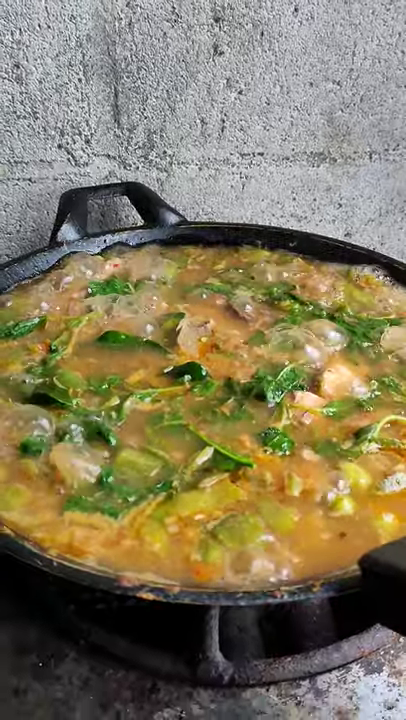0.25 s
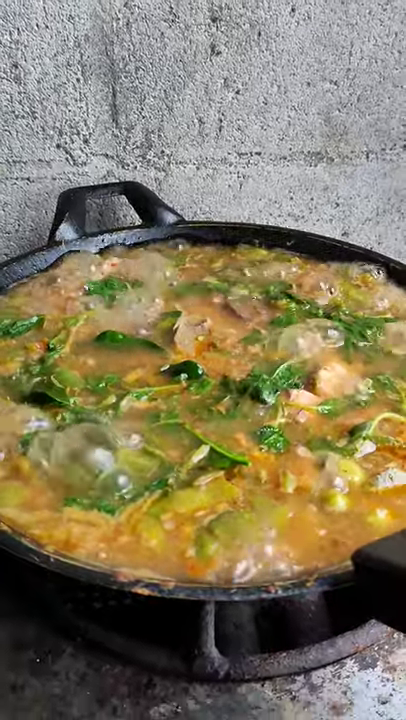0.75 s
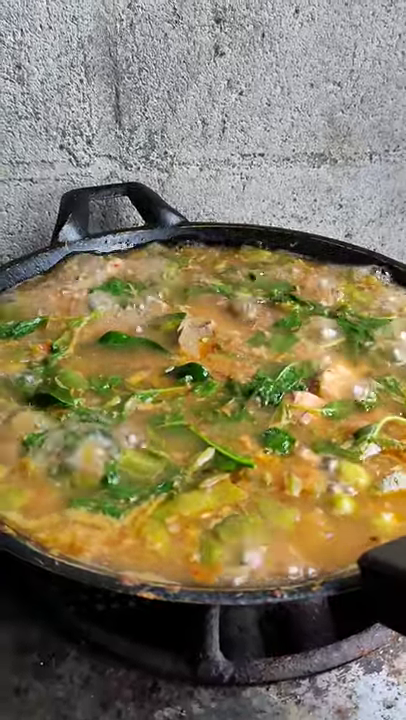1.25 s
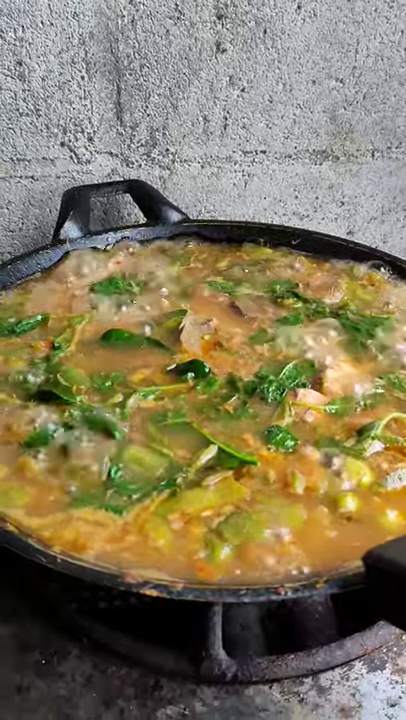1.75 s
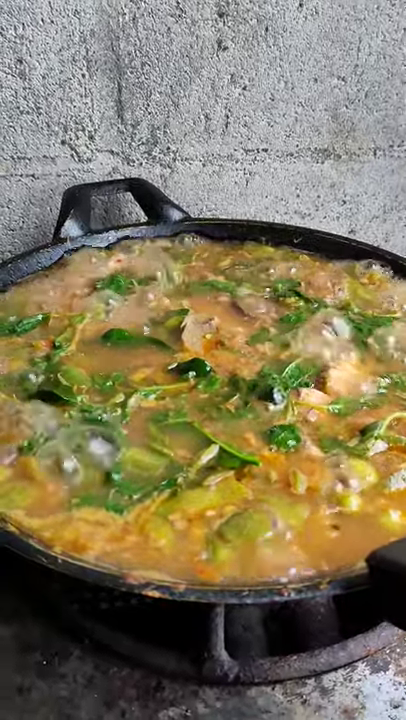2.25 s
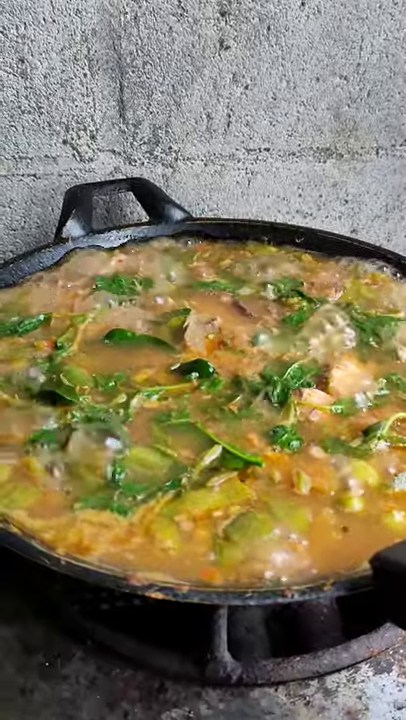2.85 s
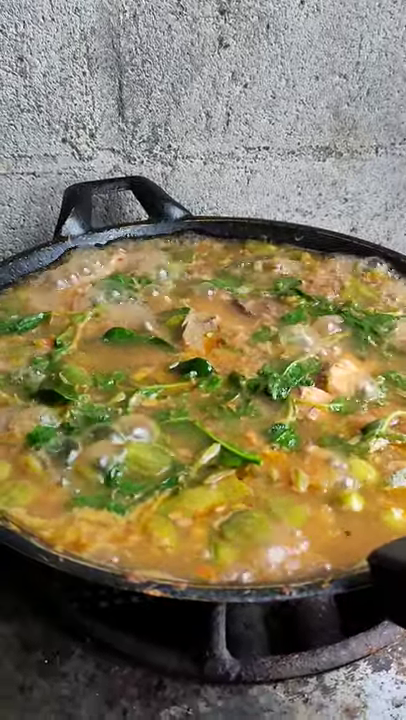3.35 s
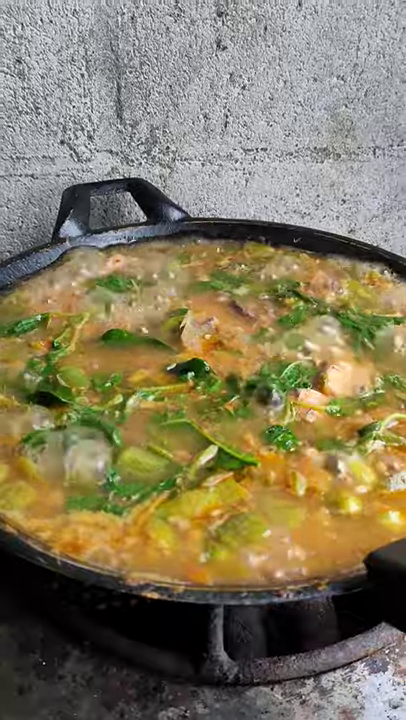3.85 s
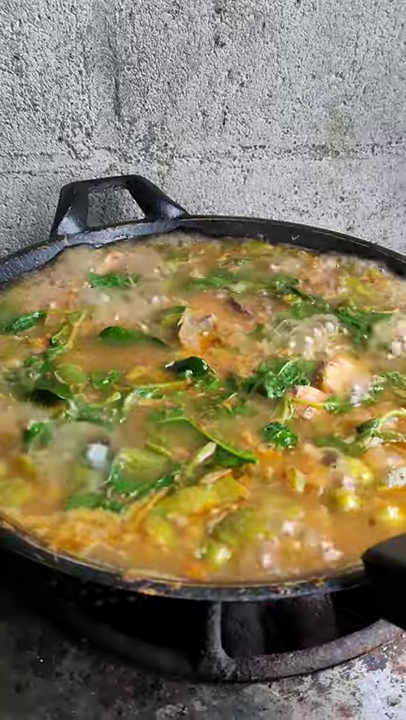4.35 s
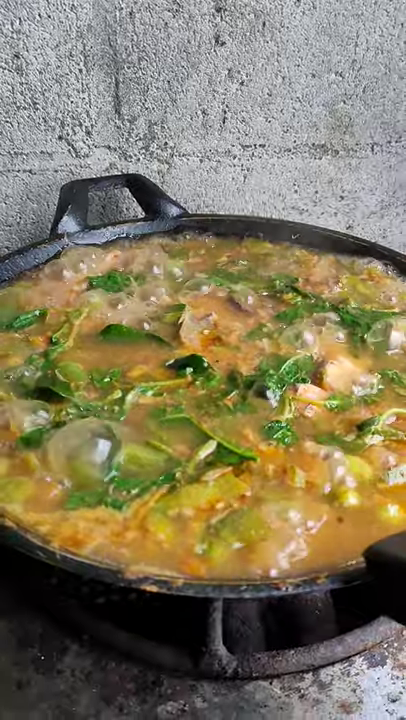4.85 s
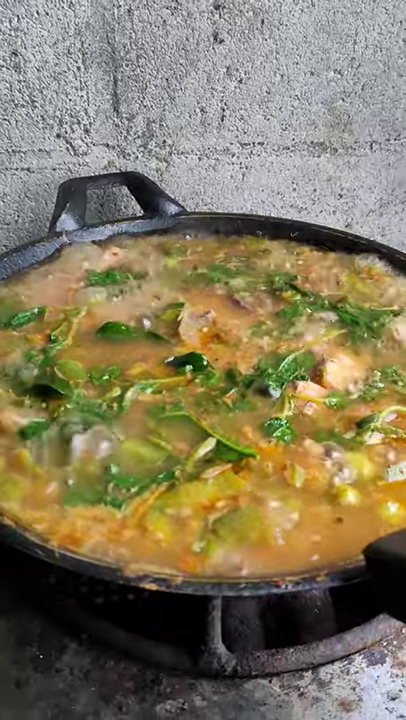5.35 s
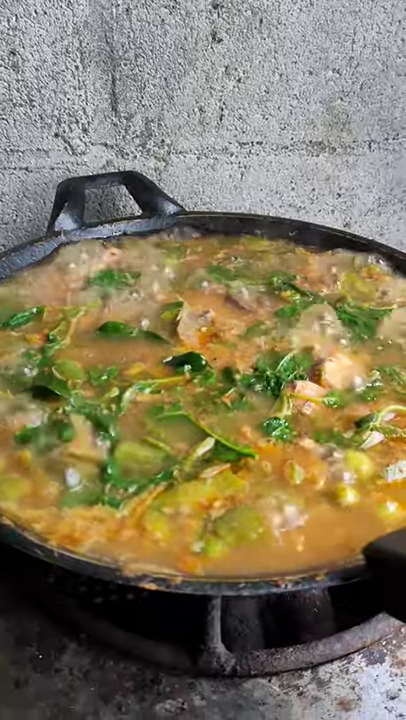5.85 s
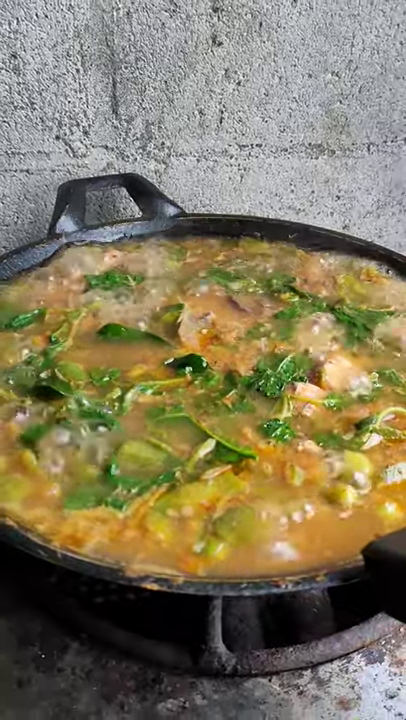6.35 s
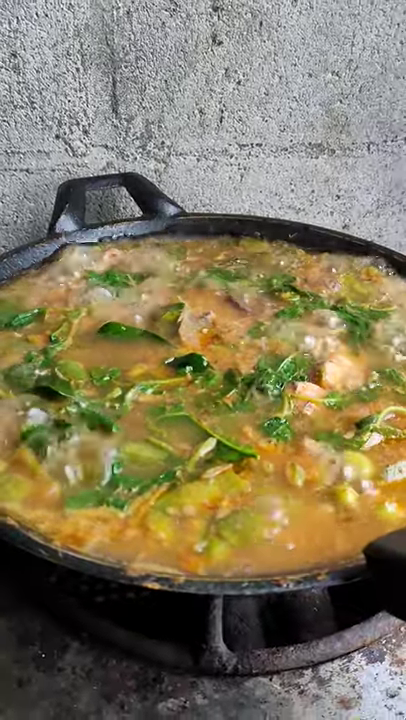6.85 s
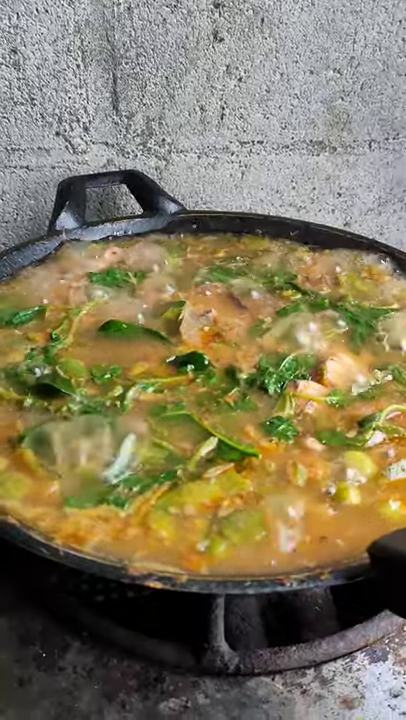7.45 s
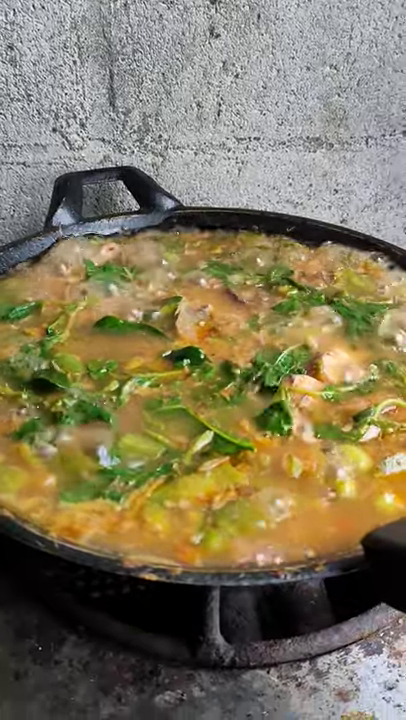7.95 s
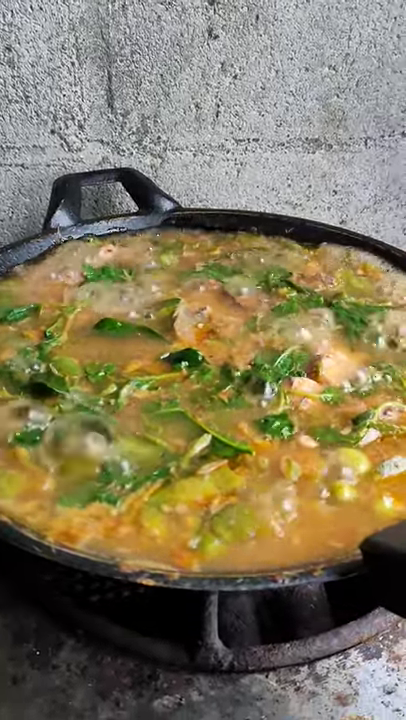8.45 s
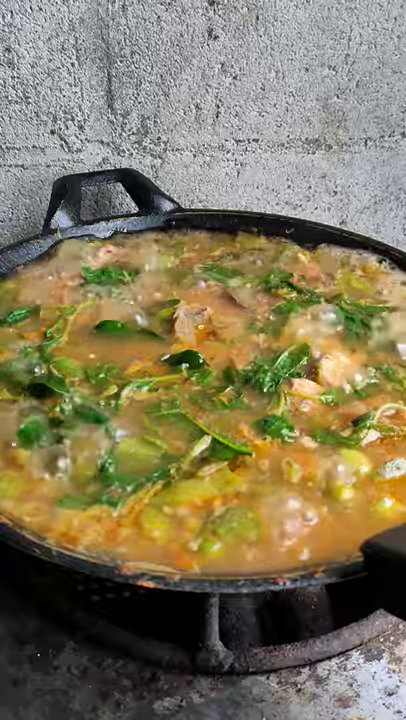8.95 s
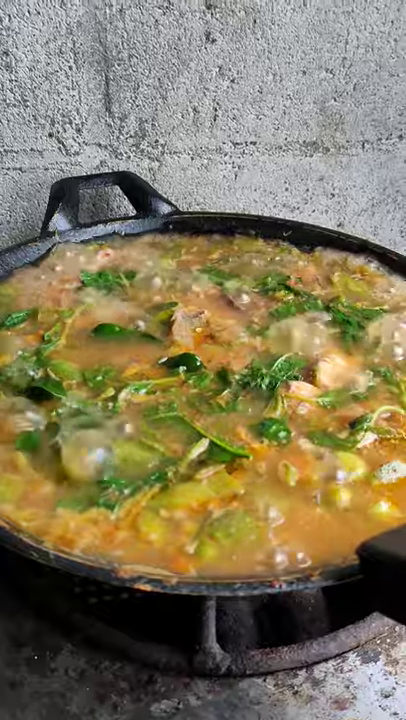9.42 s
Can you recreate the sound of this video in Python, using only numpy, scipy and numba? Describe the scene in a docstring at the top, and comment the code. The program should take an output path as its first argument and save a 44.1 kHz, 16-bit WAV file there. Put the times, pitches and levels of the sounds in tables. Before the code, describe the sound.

Close, continuous vigorous bubbling of a thick stew, bursting in uneven clusters, with snapping splashes, fine froth crackle and a soft burner hiss.

```python
"""Steam bubbles burst in clusters of short plops as thick broth boils hard in an iron pan on a gas ring,
just under a handheld phone beside a stone wall. Each bubble is a short decaying tone of rising pitch.
Splashes snap, a few squeaks glide up, froth crackles as a swarm of tiny bursts; the flame is noise.
Resonators ring the pan low, a short noise tail is the wall's answer, and the phone cuts the bass."""
import sys
import numpy as np
from scipy import signal
from scipy.fft import rfft, irfft, next_fast_len
from scipy.io import wavfile
from scipy.ndimage import uniform_filter1d
from numba import njit

SR = 44100
rng = np.random.default_rng(int(sys.argv[2]) if len(sys.argv) > 2 else 0)


def linear_from_db(decibels):
    """Turn decibels (scalar or array-like) into linear amplitude factors; 0 gives 1."""
    return 10 ** (np.asarray(decibels, float) / 20)


def pcm_store(signal):
    """Save signal as 16-bit PCM."""
    levels = np.round(np.clip(np.atleast_2d(signal), -1, 1) * 32767)
    wavfile.write(sys.argv[1], SR, levels.astype(np.int16).T)


N = 426888
STRONG_DB = -33  # peak of a strong bubble

# loudest bursting bubbles, before pan, wall and bass cut, with port colour included:
# [peak_s, peak_db, pitch_hz]
POPS = [(0.0262, -42.5, 2020), (0.032, -48, 1900), (0.0343, -48, 2400), (0.038, -51, 2600),
        (0.04, -50, 3300), (0.0437, -26.5, 6850), (0.045, -33, 4300), (0.0879, -29, 1860),
        (0.1382, -40, 1110), (0.1447, -36.5, 910), (0.1482, -30, 2100), (0.299, -38, 930),
        (0.3317, -30.5, 1860), (0.5425, -35.5, 720), (0.6869, -33.5, 930), (0.703, -38, 11700),
        (0.7784, -41, 7550), (0.821, -36, 705), (0.8318, -33, 606), (0.852, -31, 1410), (0.8682, -42, 8000),
        (0.8684, -32, 2080), (0.959, -40, 5660), (0.963, -51, 13320), (0.991, -43, 1100),
        (1.027, -45, 3370), (1.0178, -45, 7900), (1.1456, -42, 1690), (1.194, -42, 1500),
        (1.219, -41, 1400), (1.24, -42, 2030), (1.2463, -41, 4400), (1.2562, -34, 1550),
        (1.2978, -40, 13000), (1.307, -35.5, 530), (1.4603, -35.5, 580), (1.6266, -33.5, 2020),
        (1.729, -43, 9800), (1.8682, -38, 610), (1.9374, -48, 13200), (2.013, -38, 1960),
        (2.0163, -51, 12260), (2.053, -37, 8320), (2.288, -39, 1620), (2.43, -30.5, 1740),
        (2.515, -41, 960), (2.5438, -28.5, 2170), (2.6009, -36, 2180), (2.627, -38, 600), (2.66, -36, 1960),
        (2.6939, -35.5, 2040), (2.7452, -30.5, 1930), (2.751, -42, 12500), (2.7542, -36, 1200),
        (2.7605, -44, 8500), (2.8288, -30.5, 2020), (2.8516, -38, 11520), (2.9166, -37, 7350),
        (2.9432, -31, 3900), (2.9697, -41, 1850), (2.994, -34, 2200), (3.0008, -38, 720),
        (3.0037, -31.5, 7800), (3.1338, -31.5, 2170), (3.1453, -37, 1920), (3.1515, -34, 2150),
        (3.2244, -32, 1610), (3.338, -34, 1500), (3.5064, -37, 1900), (3.5281, -37, 1690),
        (3.569, -32.5, 1940), (3.621, -37, 2000), (3.6474, -30, 1060), (3.648, -32, 1720),
        (3.7256, -36, 7400), (3.877, -46, 8600), (3.9038, -34, 920), (3.9247, -34.5, 1750),
        (4.1876, -46, 7700), (4.2234, -36, 704), (4.241, -39, 7100), (4.2414, -33, 1750),
        (4.281, -32, 1580), (4.345, -39, 5100), (4.434, -33.5, 1120), (4.4368, -39, 400),
        (4.485, -29, 1900), (4.5129, -32, 2210), (4.531, -38, 2060), (4.541, -42, 2000),
        (4.6123, -47, 14000), (4.6165, -39, 1140), (4.6518, -42, 5440), (4.6566, -33, 564),
        (4.6629, -34.5, 720), (4.669, -37, 1500), (4.6873, -41, 2070), (4.7017, -52, 1500),
        (4.7117, -45, 12100), (4.736, -53, 1510), (4.788, -35, 13100), (4.813, -42, 2100),
        (4.8313, -39, 450), (4.836, -37, 556), (4.916, -32, 2220), (4.9228, -28.5, 647), (4.927, -37, 360),
        (4.9291, -38, 1160), (4.957, -38, 2170), (4.9667, -44, 13640), (4.9916, -36, 7340),
        (5.0287, -32, 1920), (5.0337, -38, 1610), (5.044, -44, 1500), (5.0445, -43, 8000),
        (5.047, -45, 1520), (5.0688, -34.5, 875), (5.0799, -32, 1170), (5.108, -39, 696),
        (5.129, -44, 9100), (5.135, -46, 7500), (5.1374, -39, 6050), (5.1387, -38.5, 604),
        (5.213, -29, 2370), (5.2152, -28, 720), (5.2778, -36, 2080), (5.316, -32, 1700), (5.322, -36, 1020),
        (5.3441, -44, 3080), (5.465, -37, 7400), (5.519, -37, 1820), (5.5422, -36, 2320),
        (5.543, -44, 1100), (5.5433, -39, 9900), (5.5441, -27, 550), (5.5523, -42, 514),
        (5.5882, -37, 1180), (5.6005, -32, 1900), (5.8014, -44, 7700), (5.8118, -33, 7200),
        (5.864, -25.5, 810), (5.871, -32.5, 965), (5.8987, -47, 12390), (5.9148, -36, 1690),
        (5.929, -32.5, 3020), (5.9482, -41, 8460), (6.0254, -37, 1000), (6.134, -36, 1420),
        (6.145, -43, 2190), (6.1521, -34, 1730), (6.1503, -45, 457), (6.168, -46, 2520),
        (6.1775, -48, 2200), (6.184, -46, 2380), (6.191, -31.5, 910), (6.2026, -45, 950), (6.24, -52, 2000),
        (6.286, -42, 1900), (6.314, -41, 3780), (6.3578, -35, 840), (6.4244, -49, 6980),
        (6.4293, -32, 7500), (6.719, -34, 534), (6.7256, -32, 616), (6.7323, -34, 805), (6.7637, -35, 1200),
        (6.7713, -32, 1720), (6.9903, -46, 12940), (7.016, -35.5, 520), (7.0234, -39, 2580),
        (7.023, -36, 1170), (7.029, -34, 1230), (7.0305, -33, 2090), (7.0397, -40, 1850),
        (7.1767, -30.5, 2270), (7.225, -36, 1060), (7.3801, -30.5, 2300), (7.3834, -39, 500),
        (7.437, -33, 680), (7.451, -33.5, 1100), (7.465, -34, 580), (7.5285, -33.5, 1940),
        (7.5489, -34, 2000), (7.5541, -37, 2000), (7.648, -34, 1710), (7.6657, -27.5, 2130),
        (7.675, -37, 2200), (7.7117, -38, 2100), (7.7177, -28, 880), (7.7205, -38, 610), (7.731, -33, 550),
        (7.737, -28, 1430), (7.7397, -43, 393), (7.7453, -37, 1200), (7.9245, -35.5, 830),
        (8.1063, -38, 2230), (8.1372, -27, 2520), (8.1368, -36, 530), (8.1467, -35, 2140),
        (8.163, -31, 1930), (8.168, -37, 7160), (8.1716, -41, 1880), (8.1205, -45, 1700),
        (8.2155, -42, 900), (8.2218, -37, 1920), (8.303, -37, 2070), (8.3268, -32, 1730),
        (8.254, -41, 1050), (8.4289, -33.5, 1580), (8.467, -35, 2000), (8.484, -40, 790),
        (8.527, -39, 6940), (8.594, -36.5, 6900), (8.6343, -33, 1050), (8.6869, -29, 2100),
        (8.718, -32, 740), (8.732, -33, 1940), (8.743, -41, 3780), (8.748, -38, 1600), (8.7722, -35, 840),
        (8.7897, -35, 1630), (8.822, -36, 990), (8.868, -36, 1810), (8.893, -30, 1690),
        (8.898, -25.5, 1740), (8.9007, -39, 680), (8.908, -36, 2460), (8.923, -45, 1710),
        (8.937, -30, 2250), (8.9535, -36, 2100), (8.9526, -35, 7600), (8.963, -45, 1900),
        (9.056, -35, 1620), (9.075, -36.5, 425), (9.16, -30, 1900), (9.1723, -43, 2240), (9.187, -40, 920),
        (9.188, -38, 2030), (9.1976, -35, 1230), (9.2434, -37, 2450), (9.2983, -41, 1030),
        (9.3157, -43, 470), (9.4202, -38, 500), (9.4307, -41, 550), (9.5463, -30.5, 2100),
        (9.6669, -32, 1670)]
# a strong 1.5 kHz bubble; small and soft ones ring for more cycles
RING_CYCLES, RING_PITCH_POWER, RING_PER_DB = 1.47, 0.49, 0.0524
SPIT_HZ, SPIT_CYCLES = 4200, 2.1  # bursts above this pitch are spits that hardly ring


def pops():
    """Big bubbles ring as their film tears; four softer droplets scatter from 7 ms before to 19 ms after each."""
    s, peak_db, hz = np.transpose(POPS)
    softness = np.exp(-RING_PER_DB * (peak_db - STRONG_DB))
    cycles = RING_CYCLES * (hz / 1500) ** RING_PITCH_POWER * softness
    cycles = np.where(hz > SPIT_HZ, np.minimum(cycles, SPIT_CYCLES), cycles)

    chance = rng.random((len(s), 3, 4))
    drop_s = (s[:, None] + 0.026 * chance[:, 0] - 0.007).ravel()
    drop_hz = (hz[:, None] * 2 ** (2.84 * chance[:, 1] - 1.8)).ravel()
    octaves_off = np.abs(np.log2(drop_hz / np.repeat(hz, 4)))
    drop_db = np.repeat(peak_db, 4) - 14 - 3 * octaves_off - 5 * (drop_hz > 2600)
    drop_cycles = 0.8 + 1.6 * chance[:, 2].ravel()

    # the film tears with a broad snap half a cycle ahead
    tear_s, tear_hz, tear_db = s - 0.5 / hz, 0.8 * hz, peak_db - 12
    tear_cycles = np.full(len(s), 0.5)
    return heard_bursts(np.r_[s, drop_s, tear_s], np.r_[hz, drop_hz, tear_hz],
                        np.r_[peak_db, drop_db, tear_db], np.r_[cycles, drop_cycles, tear_cycles], glide=0.006)


def surge(fade_s):
    """A rush of small bubbles after each big one: a swell near 1 for a strong one, fading fast."""
    s, peak_db, hz = np.transpose(POPS)
    marks = np.bincount((s * SR).astype(int), linear_from_db(peak_db - STRONG_DB) * (hz < 5000), N)
    swell = signal.lfilter([1], [1, -np.exp(-1 / (fade_s * SR))], marks)
    return np.minimum(swell, 2.5)


def bubbling(level_db):
    """Dense small plops of steam leaving the broth."""
    plops = swarm(count=4000, lo_hz=245, hi_hz=4150, spread_db=2.5, most_db=8.5,
                  cluster_db=2.5, cluster_rate_hz=60, cycles=0.78, glide=0.036)
    return heard(plops, level_db)


# big steam pockets breaking up, swell before edge smoothing: [start_s, length_s, swell_db]
GURGLES = [(0.019, 0.016, 12.5), (0.12, 0.1, 6), (0.524, 0.042, 4.5), (0.674, 0.043, 4.5),
           (0.833, 0.044, 3), (1.457, 0.022, 5), (2.311, 0.035, 6), (2.51, 0.023, 9.5), (2.56, .08, 6),
           (2.958, 0.045, 6), (3.094, 0.084, 4), (3.2, 0.023, 8), (3.455, 0.027, 2), (3.594, 0.066, 4),
           (3.9, 0.045, -0.5), (4.224, 0.06, 3), (4.41, 0.029, 5), (4.642, 0.024, 0), (4.807, 0.048, 4.5),
           (4.915, 0.034, 1), (5.016, .037, 9), (5.06, 0.038, 6), (5.22, 0.041, 4.5), (5.31, 0.085, 3),
           (5.577, 0.021, 5), (5.997, 0.044, 7), (6.15, 0.053, 7), (6.34, 0.039, 1), (6.619, 0.044, 6),
           (6.72, 0.088, -2.5), (7.01, 0.055, 5.5), (7.098, 0.051, 3.5), (7.2, 0.042, 5), (7.52, 0.022, 9),
           (7.707, 0.011, -1), (8.12, 0.029, 6), (8.278, .055, 4), (8.414, .06, 2), (8.593, 0.026, 10),
           (8.712, 0.045, 3), (8.883, 0.12, 1.5), (9.045, 0.035, 8), (9.165, 0.042, 3.5), (9.282, 0.022, 6),
           (9.404, 0.026, 10)]


def churn(edge_s):
    """Swell in dB while a pocket breaks up, with soft edges."""
    start_s, length_s, swell_db = np.transpose(GURGLES)
    edges_s = np.r_[start_s, start_s + length_s]
    steps = np.bincount((edges_s * SR).astype(int), np.r_[swell_db, -swell_db], N)
    return uniform_filter1d(np.cumsum(steps), int(edge_s * SR))


# moments when the boil catches its breath: [middle_s, half_length_s, change_db]
LULLS = [(0.095, 0.028, -2), (0.238, 0.14, -5.5), (0.627, 0.03, -12), (0.893, 0.023, -17),
         (1.088, 0.024, -15), (1.613, 0.15, -9.5), (1.8, 0.013, -23), (1.93, 0.02, -14), (2.195, 0.11, -1),
         (2.37, 0.023, -7), (2.466, 0.018, -7), (3.03, 0.048, -2.5), (3.286, 0.023, -2.5),
         (3.715, 0.015, -10), (4.367, 0.03, -7), (5.012, 0.023, -19), (5.16, 0.024, -4.5),
         (5.643, 0.028, -12), (5.847, 0.03, -5), (6.41, 0.033, -2), (7.582, 0.15, -4), (7.704, 0.011, -8),
         (8.393, 0.015, -4), (8.538, 0.061, -13.5), (9.01, 0.044, -6.5), (9.46, 0.046, -2),
         (9.632, 0.015, -10)]


def lull(t):
    """Smooth bell-shaped dips in the level of the boil, in dB."""
    return sum(db * np.exp(-((t - middle_s) / half_s) ** 2) for middle_s, half_s, db in LULLS)


# boil drive between gurgles, on which scene() sets bubbling and strays: [time_s, level_db]
BOIL = [(0.0, -53), (1.35, -52.5), (1.7, -52), (2.34, -55), (2.75, -51.5), (3.12, -52.5), (5.44, -50.5),
        (5.53, -51), (8.68, -52.5), (8.79, -52), (9.68, -52)]


def boil_drive(t):
    """Level in dB that wavers, lulls, and swells with each pop and gurgle."""
    steady_db = np.interp(t, *np.transpose(BOIL))
    rush_db = 0.9 * surge(fade_s=0.012)
    return steady_db + rush_db + churn(edge_s=0.012) + lull(t) + 0.14 * walk(21)


def strays(level_db):
    """Middle-sized bubbles bursting at random, each a rounded plop."""
    plops = swarm(count=2000, lo_hz=431, hi_hz=2920, spread_db=5.0, most_db=5.5,
                  cluster_db=2.5, cluster_rate_hz=45, cycles=1.52, glide=0.027)
    return heard(plops, level_db)


# crisp splashes of broth thrown up by a burst, before pan, wall and bass cut, with port colour included:
# [peak_s, peak_db]
SPLASHES = [(0.0357, -34), (0.04, -35), (0.043, -40), (0.412, -41), (0.447, -43), (0.564, -46),
            (0.6902, -40), (0.9158, -50), (1.0254, -42), (2.35, -39), (2.543, -41), (2.628, -39),
            (2.648, -43), (2.9433, -37), (3.106, -38), (3.147, -42), (4.343, -38), (4.4019, -47),
            (4.612, -41), (4.6507, -47), (4.6699, -34.5), (4.725, -39), (4.9003, -44), (4.9763, -37),
            (4.995, -41), (5.2125, -45), (5.3432, -37), (5.424, -37), (5.5424, -23.5), (5.6372, -36.5),
            (5.809, -38), (5.917, -38), (5.9272, -33), (5.999, -43), (6.133, -43), (6.3122, -34),
            (6.7695, -46), (7.0224, -48), (7.1764, -43), (7.3504, -40), (7.5268, -54), (8.1355, -39),
            (8.1456, -30), (8.518, -43), (8.5999, -35.5), (8.686, -42), (8.7315, -40), (8.906, -44),
            (8.934, -37), (8.952, -33), (9.242, -40)]
SPLASH_HZ, SPLASH_CYCLES = 3300, 1
# fine spray falling back: longest delay; level re splash of the earliest spray at the nominal pitch
SPRAY_S, SPRAY_DB = 0.013, -9


def splashes():
    """Short broad snaps of varied pitch, with a bright edge and a fizz of spray behind."""
    s, peak_db = np.transpose(SPLASHES)
    hz = SPLASH_HZ * 2 ** (0.13 * rng.standard_normal(len(s)))
    chance = rng.random((len(s), 2, 10))
    spray_s = (s[:, None] + SPRAY_S * chance[:, 0]).ravel()
    spray_hz = (hz[:, None] * 2 ** (1.8 * chance[:, 1] - 0.6)).ravel()
    spray_db = (peak_db[:, None] + SPRAY_DB - 8 * chance[:, 0]).ravel()
    spray_db = spray_db - 6 * np.log2(spray_hz / SPLASH_HZ)  # dB per octave
    all_s = np.r_[s, s, spray_s]
    all_hz = np.r_[hz, 2.1 * hz, spray_hz]
    all_db = np.r_[peak_db, peak_db - 19, spray_db]
    return heard_bursts(all_s, all_hz, all_db, np.full(len(all_s), SPLASH_CYCLES), glide=0.006)


# bubbles squeezed out slowly, before pan, wall and bass cut, with port colour included:
# [peak_s, peak_db, pitch_hz, ring_cycles]
SQUEAKS = [(1.158, -57, 4900, 26), (3.474, -48.5, 356, 17), (6.072, -52, 4320, 54), (6.084, -56, 3800, 30)]


def squeaks():
    """A few thin whistles gliding up."""
    s, peak_db, hz, cycles = np.transpose(SQUEAKS)
    return heard_bursts(s, hz, peak_db, cycles, glide=0.0034)


def froth(level_db):
    """Tiny film bursts, a crackle in the treble."""
    ticks = swarm(count=9000, lo_hz=3250, hi_hz=16000, spread_db=2.0, most_db=10.5,
                  cluster_db=3.5, cluster_rate_hz=90, cycles=0.66, glide=0.008)
    return heard(ticks, level_db)


# froth drive, on which scene() sets the crackle: [time_s, level_db]
FROTH = [(0.0, -66.5), (0.38, -70), (2.08, -72), (2.59, -69.5), (4.58, -69), (9.68, -69.5)]


def froth_drive(t, boil_db):
    """Level in dB that follows the surges of the boil only in part."""
    return np.interp(t, *np.transpose(FROTH)) + 0.28 * (boil_db - boil_db.mean())


def flame():
    """Smooth hiss of the gas ring: noise alike at both ports in the bass."""
    left, right = rfft(rng.standard_normal((2, N)))
    hiss = irfft(pair(left, right, np.arange(N // 2 + 1) * SR / N), N)
    return heard(hiss, -58.5)


# ring of the pan and its broth, gain before the source's share: [mode_hz, width_hz, gain_db]
PAN = [(310.3, 10, 7.5), (326, 10.3, 7.5), (464.4, 21, 3.5), (554, 13, -1), (1048, 125, -2.5),
       (2020, 350, -9.5)]


def pan(x, share):
    """Bursts and flame knock the pan's low modes, each a resonator."""
    ring = 0
    for hz, width_hz, gain_db in PAN:
        ring = ring + linear_from_db(gain_db) * signal.lfilter(*signal.iirpeak(hz, hz / width_hz, fs=SR), x)
    return x + share * ring


WALL_T60_S, WALL_DB, WALL_DELAY_S = 0.07, -6.5, 0.0015


def wall(x):
    """Quick diffuse answer from wall and stove: a decaying noise tail, new each hop as bursts move."""
    hop, size, t = 1024, 8192, np.arange(4096) / SR
    starts = np.arange(0, N, hop)
    noise = rng.standard_normal((2, len(starts), len(t)))
    decay = linear_from_db(-60 * t / WALL_T60_S) * (t > WALL_DELAY_S)
    left, right = rfft(noise * decay, size)
    tail = pair(left, right, np.arange(size // 2 + 1) * SR / size)
    tail = tail * linear_from_db(WALL_DB) / np.sqrt(np.mean(np.abs(tail) ** 2))
    padded = np.pad(x, ((0, 0), (hop, 2 * hop)))
    blocks = padded[:, starts[:, None] + np.arange(2 * hop)] * np.hanning(2 * hop)
    echoes = irfft(rfft(blocks, size) * tail, size)
    out = np.zeros((2, N + size))
    for start, echo in zip(starts, echoes.transpose(1, 0, 2)):
        out[:, start:start + size] += echo
    return x + out[:, hop:hop + N]


ALIKE_HZ = 800


def pair(left, right, hz):
    """Two spectra from two unrelated ones: alike in the bass, apart in the treble."""
    apart = hz ** 2 / (hz ** 2 + ALIKE_HZ ** 2)
    return np.array([left + apart * right, left - apart * right]) / np.sqrt(1 + apart ** 2)


def walk(rate_hz):
    """Random levels held 1 / rate_hz and slewed twice; spread about 1.5."""
    k = int(SR / rate_hz)
    held = np.repeat(rng.standard_normal(N // k + 1), k)
    return 2.0 * uniform_filter1d(uniform_filter1d(held, k), k)[:N]


@njit
def grains(at, hz, peak, phase, cycles, glide, length):
    """Each bubble swells fast, peaks on its time and dies slower; pitch climbs with every cycle."""
    y = np.zeros(length)
    for k in range(len(at)):
        rise = cycles[k] * SR / hz[k] / 2.4  # samples
        first = int(at[k] - rise) + 1
        for i in range(max(first, 0), min(first + int(7 * rise) + 1, length)):
            u = (i - at[k]) / rise + 1
            turn = (i - at[k]) * hz[k] / SR
            tone = np.cos(2 * np.pi * turn * (1 + glide * turn / 2) + phase[k])
            y[i] += peak[k] * u * np.exp(1 - u) * tone
    return y


PORT_LAG_S, LAG_SPREAD_S = 0.00009, 0.000035  # the left port is further from the pan


def burst(s, hz, peak, cycles, glide):
    """Bubbles burst all over the pan: each reaches the two ports with its own lag and balance."""
    lag_chance, lean_chance, phase_chance = rng.standard_normal((len(s), 3)).T
    lag_s = PORT_LAG_S + LAG_SPREAD_S * lag_chance
    hz = np.minimum(hz, 0.4 * SR)
    lean_db = 1.3 * np.minimum(hz / 2000, 1) * lean_chance
    return np.array([grains((s + side * lag_s / 2) * SR, hz, peak * linear_from_db(side * lean_db),
                            np.pi * phase_chance, cycles, 1.0 * glide, N) for side in (1, -1)])


def swarm(count, lo_hz, hi_hz, spread_db, most_db, cluster_db, cluster_rate_hz, cycles, glide):
    """Random bubbles, louder in clusters; each rings for a random number of cycles, and peaks rise with pitch
    so the sum is evenly bright."""
    time, pitch, size, length = rng.random((count, 4)).T
    hz = lo_hz * (hi_hz / lo_hz) ** pitch
    level_db = cluster_db * walk(cluster_rate_hz)[(time * N).astype(int)] - spread_db * np.log(1 - size)
    size_db = most_db * np.tanh(level_db / most_db)  # soft ceiling
    ring = cycles * 2 ** (2.0 * length ** 2)
    return burst(time * N / SR, hz, hz * linear_from_db(size_db) / np.sqrt(ring), ring, glide)


def heard_bursts(s, hz, peak_db, cycles, glide):
    """Listed bubbles, their peaks set as they are after the colour of the ports."""
    peak = linear_from_db(peak_db) / linear_from_db(port_db(hz)).mean(axis=0)
    return heard(burst(s, hz, peak, cycles, glide), None)


# colour of the boil at each microphone port: [freq_hz, left_db, right_db]
PORTS = [(325, -1.5, 1), (720, 0.5, 1.5), (1200, -1.5, -7), (1484, -2, 0), (2250, -1, -6), (2630, -5, -9.5),
         (3030, -9, -13.5), (4170, -8.5, -20), (4720, -15, -31), (5640, -16.5, -21.5), (6260, -16.5, -22.5),
         (7080, -14, -11), (7810, -11, -14.5), (9570, -36, -24), (9340, -20, -26), (13900, -16.5, -29.5),
         (16700, -27.5, -26)]


def port_db(hz):
    """Colour of both ports at these frequencies."""
    at_hz, left_db, right_db = np.transpose(PORTS)
    return np.array([np.interp(np.log(hz + 1), np.log(at_hz), side) for side in (left_db, right_db)])


def heard(x, level_db):
    """Colour by the ports (causal response from the cepstrum); set the rms of the middle if given."""
    size = next_fast_len(N + 4096)
    cepstrum = irfft(np.log(linear_from_db(port_db(np.arange(1025) * SR / 2048))))
    cepstrum[:, 1:1024] *= 2
    cepstrum[:, 1025:] = 0
    response = irfft(np.exp(rfft(cepstrum)))
    y = irfft(rfft(x, size) * rfft(response, size), size)[:, :N]
    if level_db is None:
        return y
    return y * linear_from_db(level_db) / np.std(y.mean(axis=0))


def scene():
    """Boil, pops, froth and flame through the pan and off the wall."""
    t = np.arange(N) / SR
    boil_db = boil_drive(t)
    # strays follow the swells only in part
    stray_db = boil_db - 0.5 * (boil_db - boil_db.mean()) - 4.0
    big = pops() + splashes() + squeaks() + strays(stray_db)
    # big bubbles burst at the surface, far from the iron; the flame licks it
    boil = pan(bubbling(boil_db - 6.0), share=0.95) + pan(big, share=0.24)
    crackle = froth(froth_drive(t, boil_db) + 8.5)
    return wall(boil + crackle + pan(flame(), share=1.62))


def band_limit(x):
    """A steep low-pass at the top of the band."""
    return signal.sosfilt(signal.butter(12, 15760, fs=SR, output="sos"), x)


BASS_CUT_HZ, TOP_HZ, FLOOR_HZ = 288, 15750, 52


def record(dry):
    """The phone cuts the bass steeply and the top; a very faint noise floor below 52 Hz follows the bass cut."""
    bass_cut = signal.cheby1(6, 1.2, BASS_CUT_HZ, "highpass", fs=SR, output="sos")
    floor_band = signal.butter(4, FLOOR_HZ, fs=SR, output="sos")
    top_cut = signal.ellip(8, 0.2, 70, TOP_HZ, fs=SR, output="sos")
    low_floor = linear_from_db(-87) * signal.sosfilt(floor_band, rng.standard_normal(N))
    # the floor is added after the bass cut
    mix = signal.sosfilt(top_cut, signal.sosfilt(bass_cut, dry) + low_floor)
    return band_limit(mix)


dry = scene()
out = record(dry)
pcm_store(out)
```